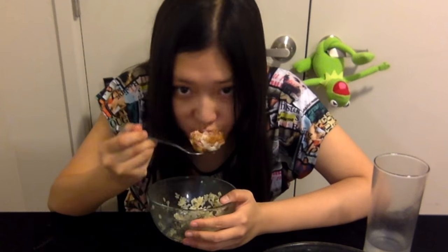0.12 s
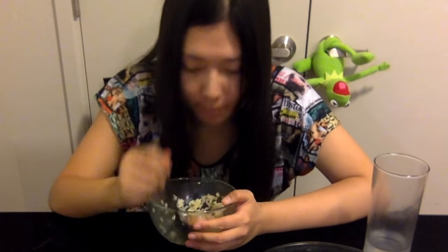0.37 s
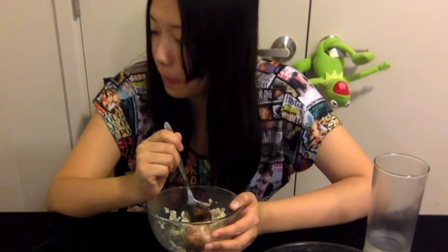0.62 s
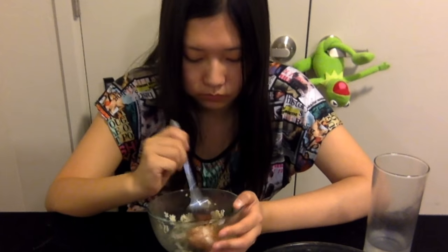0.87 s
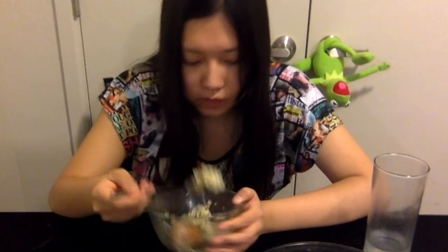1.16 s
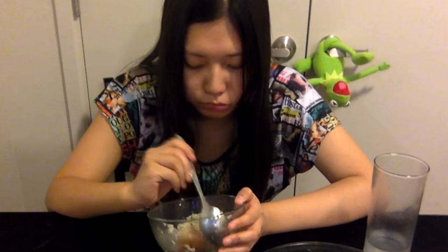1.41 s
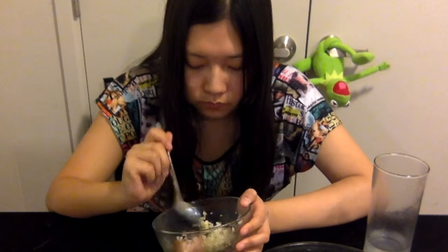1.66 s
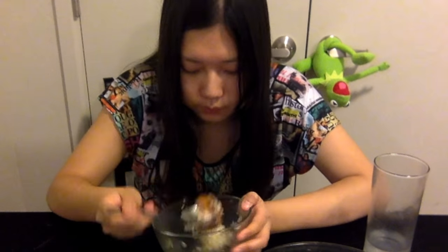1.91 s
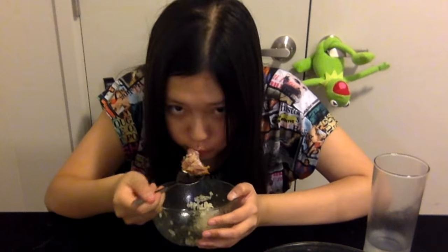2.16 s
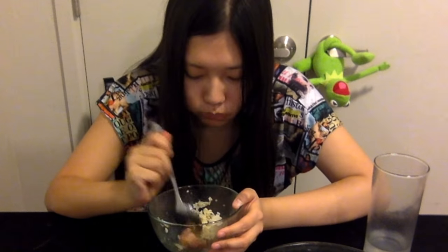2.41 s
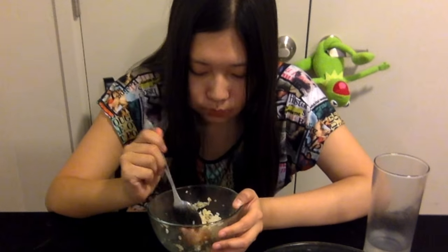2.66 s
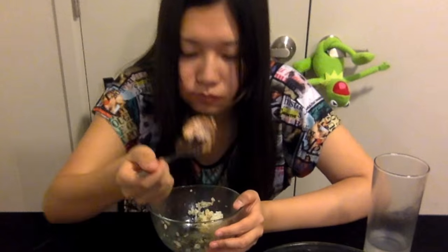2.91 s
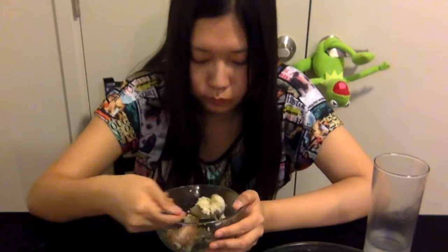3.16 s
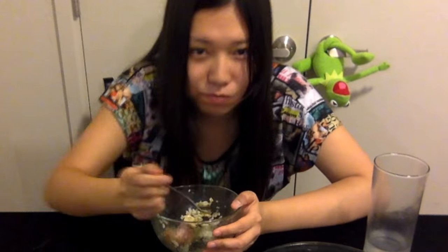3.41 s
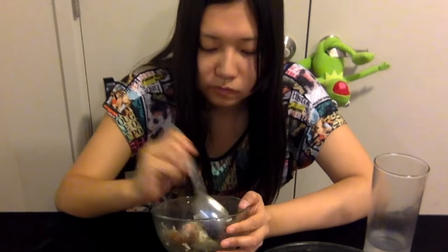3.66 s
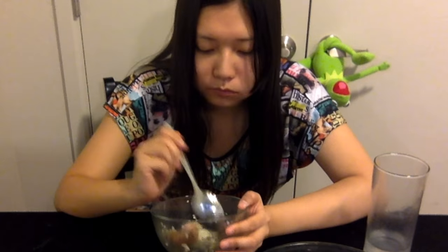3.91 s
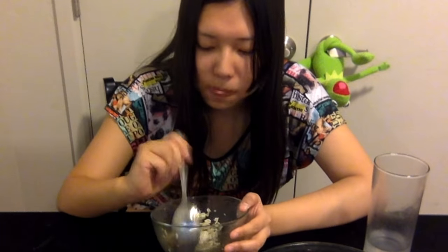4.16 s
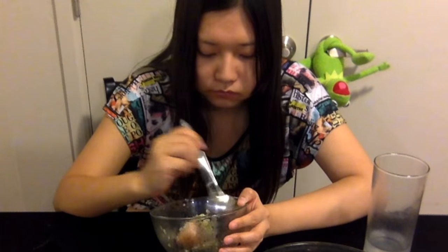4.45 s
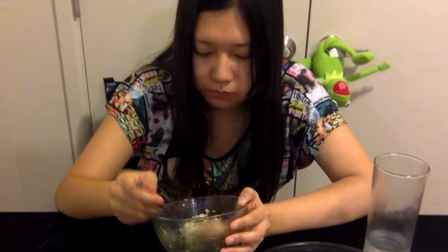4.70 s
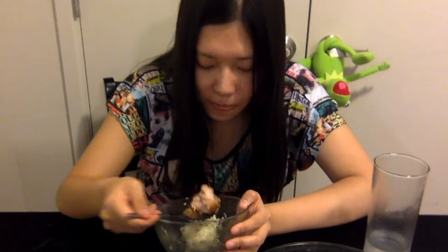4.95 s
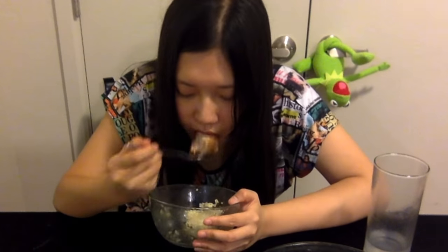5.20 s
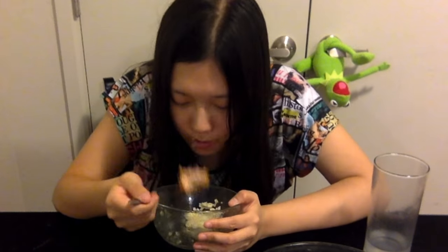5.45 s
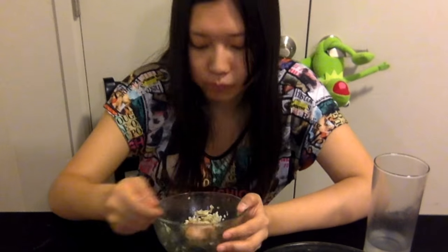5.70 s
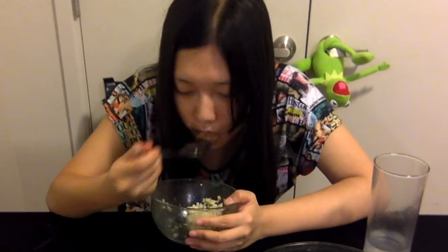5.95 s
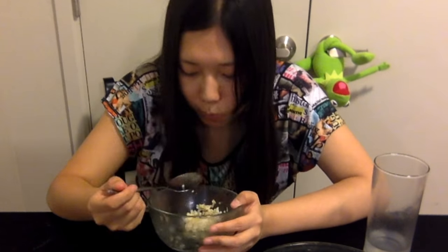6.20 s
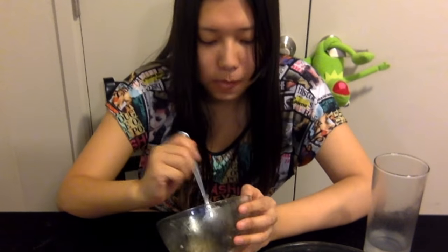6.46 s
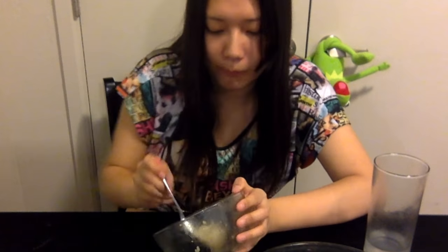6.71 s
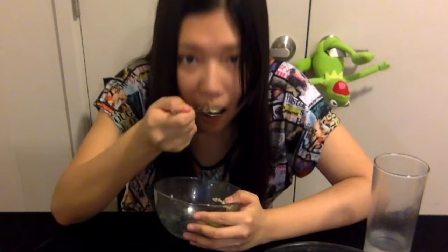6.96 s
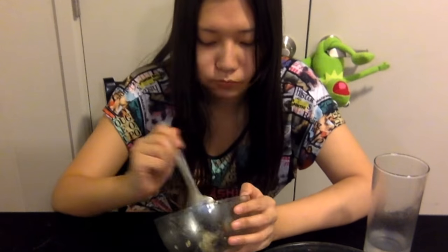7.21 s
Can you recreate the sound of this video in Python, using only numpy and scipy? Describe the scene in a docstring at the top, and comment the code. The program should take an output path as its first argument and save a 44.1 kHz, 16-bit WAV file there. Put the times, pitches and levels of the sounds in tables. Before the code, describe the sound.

In a small quiet room with a short echo, dry, bright spoon-on-glass clicks come in time-lapse bursts, sparse in the middle, then a crowded clatter. A brief buzz behind leads to a motor and airy fan whistle rising quickly, surging and settling. Two last busy bursts of scraping clinks ring close up over the fan, with soft hiss and thin ticks.

```python
"""A metal spoon taps and scrapes a glass bowl held on a table, all sped up about eightfold, so every ring
is short and high: each contact's rough force excites decaying modes, and walls add a short echo.
Late on an appliance relay buzzes (wavering sines), then its motor and fan spin up and keep running
(shaft sines, a resonant whistle, shaped noise). Behind it a quiet room hisses, hums and ticks."""
import sys
import numpy as np
from scipy import signal
from scipy.fft import rfft, irfft
from scipy.io import wavfile
from scipy.ndimage import uniform_filter1d

SR = 44100
rng = np.random.default_rng(int(sys.argv[2]) if len(sys.argv) > 2 else 0)


def volts(x):
    """Linear amplitude factor 10**(x/20) for a level x in dB, scalar or array-like."""
    e = np.asarray(x, float) / 20
    return 10 ** e


def persist_wave(psi):
    """Save psi, clipped to +-1, as 16-bit WAV."""
    counts = np.round(np.clip(psi, -1, 1) * 32767).astype(np.int16)
    wavfile.write(sys.argv[1], SR, np.atleast_2d(counts).T)


N = 324090


def evened(x):
    """Scales x to rms one."""
    return x / np.sqrt(np.mean(x ** 2) + 1e-20)


def curve(rows):
    """Interpolates every column of a time table at every sample."""
    s, *columns = np.transpose(rows)
    return [np.interp(np.arange(N) / SR, s, column) for column in columns]


def coloured(x, points):
    """Shapes x to a spectrum given as (Hz, dB) points, at rms one."""
    hz, db = np.transpose(points)
    f = np.fft.rfftfreq(len(x), 1 / SR)
    gain_db = np.interp(np.log(f + 1), np.log(hz + 1), db)
    return evened(irfft(rfft(x) * volts(gain_db), len(x)))


def band(x, lo_hz, hi_hz):
    """Causal band-pass."""
    return signal.sosfilt(signal.butter(2, [lo_hz, hi_hz], "band", fs=SR, output="sos"), x)


def wander(smooth_s):
    """Noise smoothed twice over smooth_s, rms one."""
    size = max(int(smooth_s * SR), 1)
    once = uniform_filter1d(rng.standard_normal(N), size)
    return evened(uniform_filter1d(once, size))


def resonate(x, hz, width_hz):
    """Resonance at a fixed or moving hz: shifts hz to zero, smooths, shifts back."""
    turn = np.exp(2j * np.pi * np.cumsum(hz * np.ones(len(x))) / SR)
    r = np.exp(-np.pi * width_hz / SR)
    return 2 * (turn * signal.lfilter([1 - r], [1, -r], x / turn)).real


def gate(start_s, end_s, edge_s):
    """One from start to end, with linear edges."""
    t = np.arange(N) / SR
    return np.clip(np.minimum(t - start_s, end_s + edge_s - t) / edge_s, 0, 1)


def add(mix, s, sound):
    """Mixes a sound in from time s."""
    mix[round(s * SR):][:len(sound)] += sound


# spoon contacts: (time [s], strength [dB], rim, body and tip re strength [dB])
BLOWS = [(0.0496, -67, 3, 2, -12), (0.4056, -25, -10, -15, -7), (0.4262, -26, -15, -18, 0.5),
         (0.7006, -52.5, -16, -12, -3), (0.7629, -29, -8.5, -17.5, -27), (0.844, -50, -23, -20, -30),
         (0.9148, -16, -10, -16.5, -32), (0.9527, -24, -21.5, -16.5, -21), (0.9967, -27, -19, -6.5, -2),
         (1.051, -14, -15.5, -7.5, -6), (1.1153, -13.5, -8, -16.5, -24), (1.1274, -31, -22, -26, -27),
         (1.2228, -22.5, -12.5, -16.5, 2), (1.2791, -47.5, -6.5, -18, -26), (1.4804, -32.5, -31, -24, -2.5),
         (1.4951, -44, -16, -20, -6), (1.5011, -28, -22.5, -24, -27), (1.5716, -21, -8.5, -18.5, -18),
         (1.6432, -18.5, -10, -13.5, -29), (1.8937, -36, -18, -26, -20), (1.9075, -39.5, -8, -4.5, -6.5),
         (2.0361, -34, -19, -21, -7), (2.256, -53.5, 0.5, -10, -9), (2.5571, -32, -20.5, -21, 0),
         (2.7965, -44, -8, -16, 0.5), (2.8224, -45, -10, -15, -16), (2.8981, -45, -8.5, -13.5, -11),
         (3.1468, -20, -24.5, -19, -15), (3.4418, -49.5, -28, -22, -17), (3.5831, -36.5, -19, -18, 1.5),
         (3.6049, -29.5, -19.5, -22, -9), (3.635, -33, -16, -18, -3.5), (3.6427, -28.5, -16.5, -20, -10),
         (3.696, -48.5, -8, -16, -17), (3.7216, -26.5, -19, -20, 3.5), (3.7644, -29, -15, -16, -2),
         (3.7816, -37.5, -10, -8, 2), (3.8167, -25, -17, -18, 3), (3.83, -25, -23, -17, -10),
         (3.8603, -31, -13, -14, -1), (3.898, -32.5, -18, -17, -1.5), (3.9519, -37, -23, -18, -10),
         (3.9566, -47.5, -8, -3.5, -7), (3.9921, -24.5, -22.5, -17.5, 1), (4.0033, -29, -20, -16, -6),
         (4.0107, -23.5, -17, -19, -17), (4.0412, -30, -17, -19.5, 3.5), (4.081, -29.5, -15, -19, 8),
         (4.115, -28, -19, -21, -3), (4.1528, -27, -18, -18, 3.5), (4.1881, -22, -24, -23, -1.5),
         (4.2281, -31, -24, -24, 0), (4.2441, -34.5, -15, -18, -13), (4.2882, -35.5, -10, -14, -5),
         (4.3076, -34.5, -9.5, -24, -14), (4.3157, -33, -9.5, -20, -6), (4.344, -22, -15.5, -19, 0),
         (4.3784, -13, -8.5, -15.5, -19), (4.4132, -10.5, -12.5, -18, -19), (4.4494, -21.5, -21, -19, -11),
         (4.4888, -14, -19.5, -10, -8), (4.5255, -22, -26, -24, -7), (4.538, -40, -17, -26, -24),
         (4.563, -19, -24, -21, -8), (4.568, -18, -10, -16.5, -15), (4.593, -10.5, -10.5, -17.5, -12),
         (4.5988, -16, -5, -10, -20), (4.631, -13, -9, -18, -20), (4.6588, -14.5, -12, -17.5, -16),
         (4.6901, -12, -8, -14, -21), (4.7187, -28, -17, -18.5, -11), (4.9185, -29.5, -13.5, -15, -2),
         (4.9742, -23, -7, -15.5, 2.5), (5.038, -45, -6, -14, -12), (5.1528, -40.5, -15, -18, -10),
         (5.5657, -21.5, -15, -15, -9), (5.7075, -26.5, -17, -16, -5), (5.7681, -26, -9, -14, 0.5),
         (6.326, -28, -14, -19, 1), (6.3573, -24, -15, -16, -3.5), (6.3866, -12, -9.5, -11.5, -31),
         (6.4186, -12.5, -11, -15.5, -36), (6.4284, -19.5, -3, -21, -30), (6.4472, -14, -9, -16, -18),
         (6.4835, -12.5, -12.5, -19.5, -21), (6.5134, -24.5, -10, -14, -2), (6.5191, -17, -13, -17, -30),
         (6.544, -15, -15.5, -12.5, -11), (6.5792, -18.5, -16, -17, 1), (6.6101, -15.5, -10.5, -18.5, -18),
         (6.6438, -19.5, -13, -12.5, -8), (6.6779, -17.5, -17, -18.5, -10), (6.7126, -19, -21, -22, -9),
         (7.1731, -28, -13, -9, -1), (7.218, -11.5, -14, -18, -15), (7.248, -18, -9.5, -11, -4),
         (7.2577, -9, -10.5, -14.5, -15), (7.3304, -26, -8, -20, -16)]
# lowest ring, thud on the table: (level [dB], gain per dB of strength, of rim and of tip [dB/dB])
KNOCK = [(-4.5, 0.91, 0.81, 0.15), (-35.5, 0.49, -0.031, 1)]
RUB_S, RUB_PER_DB = 0.015, 0.26  # rub length at equal tip and rim; its growth as tip outweighs rim


def blows():
    """Each contact rings bowl and spoon and knocks the bowl against the table."""
    out = np.zeros(N + 2560)
    for s, db, rim_db, body_db, tip_db in BLOWS:
        knock_db = [own + a * db + b * rim_db + c * tip_db for own, a, b, c in KNOCK]
        # a spoon sliding on its tip rubs longer than one that strikes the rim
        rub_s = RUB_S * volts(RUB_PER_DB * (tip_db - rim_db))
        ring_db = [db + rim_db, db + body_db, db, db + tip_db]
        add(out, s - .0004, strike(ring_db, first=0, rub_s=rub_s))
        add(out, s - .0004, strike(knock_db, first=4, rub_s=.015))
    return out[:N]


# modes of bowl and spoon before spot and grip: (frequency [Hz], level [dB], t60 [s])
RING_MODES = [(990, 0, .018), (1950, -8, .014), (2390, -12, .02), (2710, 0, .026), (3930, -5, .02),
              (4260, 0, .04), (4750, -5, .02), (5370, -9, .015), (7100, -1, .022), (7790, 0, .016),
              (8300, -2, .018), (8850, -5, .018), (9380, -4, .018), (10400, -5, .015), (11100, -7, .014),
              (12050, -9, .012), (14400, -10, .012), (15200, -4, .018), (15560, 0, .028)]
# rim, body, wall, tip, lowest ring, thud: (low edge [Hz], high edge [Hz])
PART_HZ = [(1900, 3200), (3600, 5700), (6000, 11800), (14300, 15900), (800, 1250), (60, 900)]
# same parts: (coupling to the air [dB], share of crack [0-1], snap t60 [s], rub level [dB])
PARTS = [(-3.5, 0.56, 0.0047, -16.5), (-0.38, 0.83, 0.0084, -14), (-9.5, 0.56, 0.0093, -14.5),
         (-7, 0.78, 0.016, -8.5), (-15, 0.42, 0.0036, -16.5), (-1.5, 1, 0.019, -1)]
GRIP = .65  # the hand shortens every t60 by this factor
SPOT_DB, DETUNE = 2.5, .018  # random spread of mode level and relative pitch per contact


def strike(levels_db, first, rub_s):
    """A contact snaps and rubs on; that force rings the modes, unevenly on each new spot."""
    t = np.arange(2560) / SR
    hz, mode_db, t60 = np.transpose(RING_MODES)[:, :, None]
    level_draw, pitch_draw = rng.standard_normal((2, len(RING_MODES), 1))
    decay = volts(mode_db + SPOT_DB * level_draw - 60 * t / (t60 * GRIP))
    modes = decay * np.sin(2 * np.pi * hz * (1 + DETUNE * pitch_draw) * t)
    grit = rng.standard_normal(len(t))
    # the spoon catches and lets go
    slips = volts(2.5 * evened(uniform_filter1d(rng.standard_normal(len(t)), size=70)))
    leaving = 1 + (t / max(rub_s, .002)) ** 6  # the rub ends as the spoon leaves the glass
    rub = slips * volts(-60 * t / 0.084) / leaving
    head, sound = slice(0, 260), 0  # levels are set over the first 260 samples
    parts = zip(levels_db, PART_HZ[first:], PARTS[first:])
    for level_db, (lo, hi), (air_db, share, snap_t60, rub_db) in parts:
        force = grit * (volts(-60 * t / snap_t60) + volts(rub_db) * rub)
        if lo > 100:
            crack = band(force, lo, hi)
        else:  # the thud is broad
            crack = signal.lfilter(*signal.butter(1, [lo, hi], "band", fs=SR), force)
        struck = modes[(hz[:, 0] > lo) & (hz[:, 0] < hi)].sum(0)
        # one clean blow, then the rough force
        ring = struck + .12 * signal.fftconvolve(force, struck)[:len(t)]
        part = share * crack / crack[head].std() + (1 - share) * ring / (ring[head].std() + 1e-9)
        sound = sound + volts(level_db + air_db) * part / part[head].std()
    return sound * np.minimum(t / 0.0006, 1)


def walls(x):
    """Dense short echo of random reflections; treble dies first."""
    t = np.arange(6000) / SR
    taps = rng.standard_normal(len(t)) * (t > .0015)
    low = band(taps, 432, 5700) * volts(-60 * t / 0.15)
    high = band(taps, 5200, 13000) * volts(-60 * t / 0.1)
    tail = low + high
    return signal.oaconvolve(x, tail / np.linalg.norm(tail))[:N]


# broadband rush: the fan's air, plus spoon scraping around 6.3-6.8 s: (time [s], level [dB])
RUSH_LEVEL = [(5.35, -83), (5.44, -61), (5.475, -53), (5.505, -45), (5.57, -39.5), (5.695, -40),
              (5.712, -56), (5.8, -48.5), (5.9, -54), (5.96, -48.5), (6.12, -54), (6.3, -55), (6.45, -44.5),
              (6.72, -46.5), (6.85, -55), (7.1, -56), (7.35, -45.5)]
START_S, SPIN_UP_S = 5.47, .05  # start of spin-up; time constant of the lag


def motor():
    """Shaft and fan spin up; whistle and rush follow the rush level, the roar swells partway through spin-up."""
    t, rush_db = np.arange(N) / SR, curve(RUSH_LEVEL)[0]
    behind = np.exp(-np.maximum(t - START_S, 0) / SPIN_UP_S)  # 1 at rest, 0 at full speed
    end_db = rush_db[-1]
    excess_db = rush_db - end_db
    fan = whistle(behind, end_db, excess_db) + rush(rush_db) + roar(behind, end_db)
    return gate(RUSH_LEVEL[0][0], t[-1], 0.16) * (shaft(behind) + fan)


# duct resonances: (frequency [Hz], width [Hz], level [dB])
DUCT = [(3040, 100, 11), (4020, 260, 2.7)]
WHISTLE_HZ, WHISTLE_LAG = 4030, .35  # pitch at START_S without lag; fraction below it at rest
SAG_HZ_PER_S, WAVER_HZ = 45, 30


def whistle(behind, end_db, excess_db):
    """Noise through resonances that follow the fan's pitch; loud where it meets the duct, plus an octave."""
    t = np.arange(N) / SR
    hz = WHISTLE_HZ * (1 - WHISTLE_LAG * behind) - SAG_HZ_PER_S * (t - START_S)
    hz = hz + WAVER_HZ * wander(0.019)
    duct_gain = sum(volts(db) / (1 + ((hz - f) / width) ** 4) for f, width, db in DUCT)
    air = rng.standard_normal((2, N))
    tone = evened(resonate(resonate(air[0], hz, 110), hz, 220)) * volts(3.0 * wander(0.007))
    octave = evened(resonate(resonate(air[1], 2 * hz, 360), 2 * hz, 400))
    tone_db = end_db - 1 + 1.21 * excess_db
    octave_db = end_db - 6.5 + 1.57 * excess_db  # rises faster than the rush
    return volts(tone_db) * duct_gain * tone + volts(octave_db) * octave


# spectrum of the rush: (frequency [Hz], relative density [dB per Hz])
RUSH = [(59, -69), (100, -42), (466, -23.5), (710, -18.5), (1180, -5.5), (1390, -16.5), (2040, -12.5),
        (3310, -20), (3910, -6.5), (4630, -24.5), (7850, -15.5), (15400, -27.5)]


def rush(rush_db):
    """Broadband rush: shaped noise at the given level, slightly wavering."""
    return volts(rush_db) * coloured(rng.standard_normal(N), RUSH) * volts(1.0 * wander(0.03))


def roar(behind, end_db):
    """Noise resonating near 1 kHz in the duct, louder partway through spin-up."""
    noise = evened(resonate(resonate(rng.standard_normal(N), 1010, 93), 1110, 320))
    level_db = end_db - 10.5 + 20 * np.sqrt(behind) * (1 - behind)
    return volts(level_db) * noise * volts(1.3 * wander(0.064))


# shaft orders: (multiple of shaft rate [1], level at full speed [dB])
SHAFT = [(7, -64), (8, -53.5), (10, -72.5), (12, -61.5), (13, -67), (14, -56)]
FULL_SPEED_HZ, SHAFT_LAG = 148.05, .2  # full shaft rate; fraction below it at rest


def shaft(behind):
    """Sines at multiples of the shaft rate, growing steeply with speed."""
    speed_hz = FULL_SPEED_HZ * (1 - SHAFT_LAG * behind ** 2)
    turns = np.cumsum(speed_hz) / SR
    orders = sum(np.sqrt(2) * volts(db + 1.5 * wander(.05)) * np.sin(2 * np.pi * k * turns)
                 for k, db in SHAFT)
    return (speed_hz / speed_hz[-1]) ** 12 * orders


# buzz tones: high, low, middle [Hz]
BUZZ_HZ = 1925, 473, 965
# relay pulling in: (time [s], length [s], high level [dB], middle level [dB])
PULLS = [(5.167, 0.005, -70, -52), (5.209, 0.021, -41, -60), (5.266, 0.011, -47.5, -66)]
# coil hum after the first pull, rows high, low, middle: (level before fade [dB], silent by [s])
HOLD = [(-61.5, 5.36), (-64.5, 5.8), (-64.5, 5.5)]
PULL_LOW_DB, PULL_EDGE_S = -66, 0.0025


def relay():
    """A loose coil rattles in three wavering tones, in short pulls over a dying hum."""
    t, first_s = np.arange(N) / SR, PULLS[0][0]
    level = np.array([volts(db) * gate(first_s, end_s, edge_s=0.0089) * np.clip((end_s - t) / 0.11, 0, 1)
                      for db, end_s in HOLD])
    for s, length_s, high_db, middle_db in PULLS:
        pull_db = np.array([[high_db], [PULL_LOW_DB], [middle_db]])
        level += volts(pull_db) * gate(s, s + length_s, PULL_EDGE_S)
    tones = 0
    for hz, gain in zip(BUZZ_HZ, level):
        phase = 2 * np.pi * (hz * t + 0.022 * wander(0.00074))
        tones = tones + gain * volts(2.2 * wander(0.0032)) * np.sin(phase)
    return np.sqrt(2) * tones


# drift of hiss and tones: (time [s], gain [dB])
SWELL = [(0, 0), (1, 3.5), (2, 1), (5, 3.5), (7.35, 10.5)]


def room_noise():
    """Distant ventilation: drifting hiss and tones, with faint high ticks."""
    return (hiss() + room_tones()) * volts(curve(SWELL)[0]) + ticks()


# hiss spectrum: (frequency [Hz], relative density [dB per Hz])
AIR = [(35, -69), (60, -30), (403, -39), (464, -13), (586, -17), (938, -9.5), (1370, -9.5), (1810, -0.5),
       (2400, 0.5), (2970, -6.5), (3670, -8.5), (4530, -16.5), (9170, -16), (15000, -19.5), (16500, -42.5)]


def hiss():
    """Soft shaped noise with two faint high bands; levels before the drift."""
    air = rng.standard_normal((2, N))
    high = evened(resonate(air[1], 9400, 300) + resonate(air[1], 11600, 400))
    return volts(-69) * coloured(air[0], AIR) + volts(-83) * high


# room tones: (frequency [Hz], level before wander and drift [dB])
HUM = [(470, -84.5), (955, -89.5), (1615, -84.5), (1857, -78), (2375, -73.5), (2730, -88.5), (3635, -82.5),
       (4274, -88)]


def room_tones():
    """Held sines, slightly wavering in level and phase."""
    t = np.arange(N) / SR
    return sum(volts(db + 1.39 * wander(0.0091)) * np.sqrt(2)
               * np.sin(2 * np.pi * (hz * t + 0.015 * wander(.02))) for hz, db in HUM)


def ticks():
    """Random high noise bursts, about 14 per second."""
    hits = volts(1.3 * rng.exponential(1, N)) * (rng.random(N) < 14 / SR)
    burst = rng.standard_normal(300) * volts(-60 * np.arange(300) / SR / 0.0058)
    bursts = signal.oaconvolve(hits, burst)[:N]
    return volts(-54.5) * band(band(bursts, 8100, 16000), 8100, 16000)


def scene():
    """Spoon close, room and appliance behind; one channel."""
    spoon = blows()
    return (spoon + volts(-23) * walls(spoon) + motor() + relay() + room_noise())[None]


def roll_off(x):
    """The treble ends steeply here."""
    return signal.sosfilt(signal.butter(12, 17140, fs=SR, output="sos"), x)


def record(dry):
    """Low-passes the mix at 16.3 kHz with a linear-phase filter."""
    limited = signal.oaconvolve(dry, signal.firwin(255, 16300, fs=SR)[None], "same")
    return roll_off(limited)


dry = scene()
out = record(dry)
persist_wave(out)
```